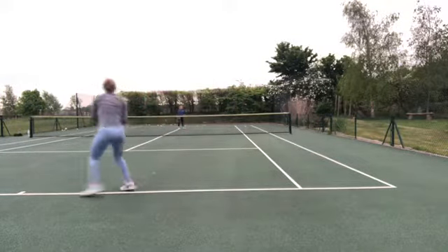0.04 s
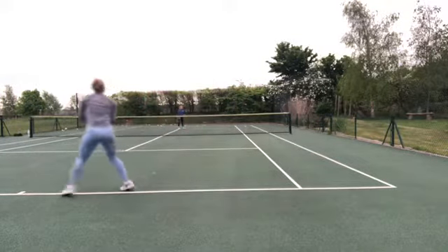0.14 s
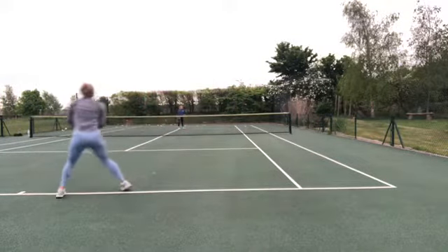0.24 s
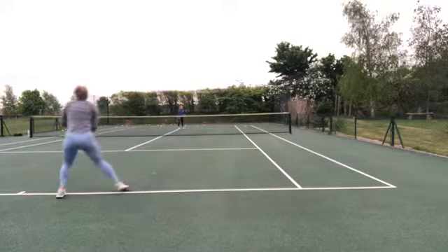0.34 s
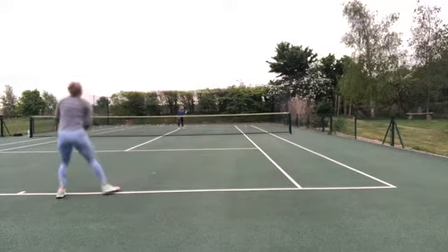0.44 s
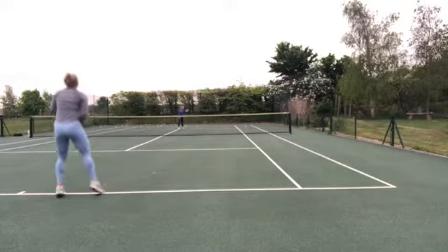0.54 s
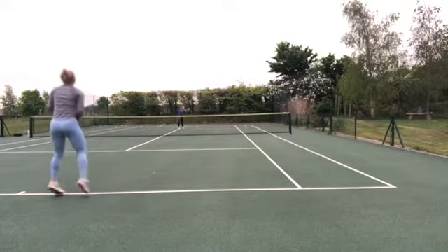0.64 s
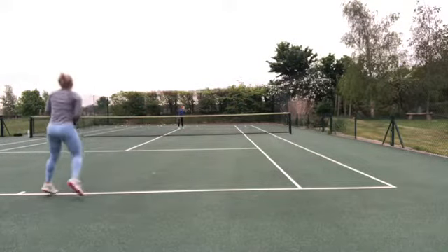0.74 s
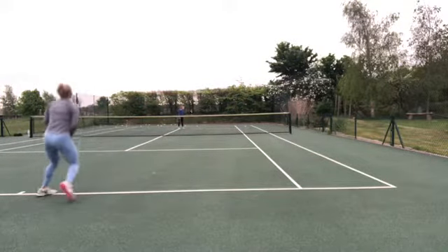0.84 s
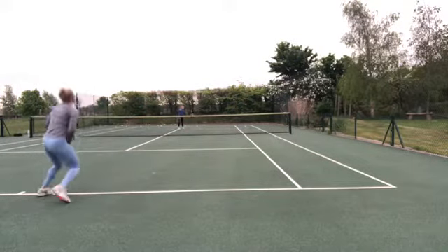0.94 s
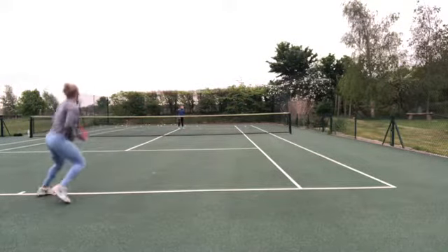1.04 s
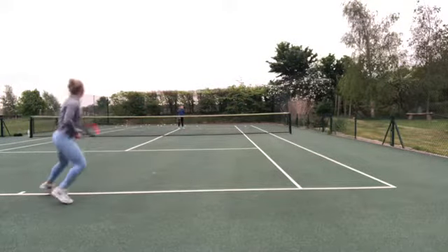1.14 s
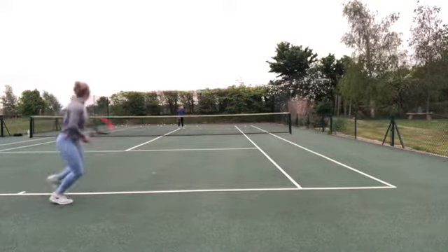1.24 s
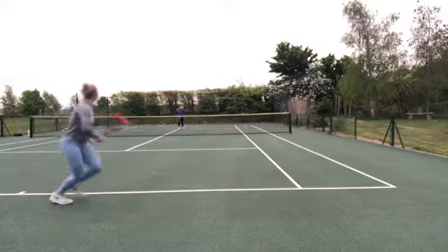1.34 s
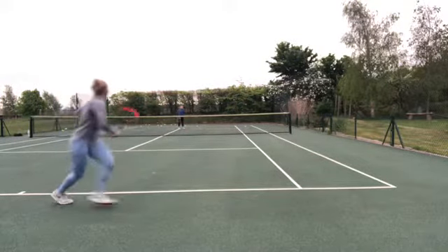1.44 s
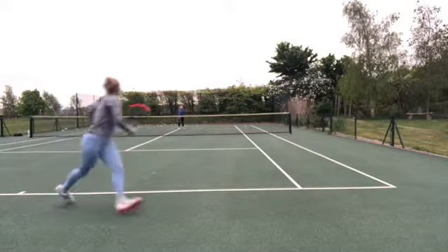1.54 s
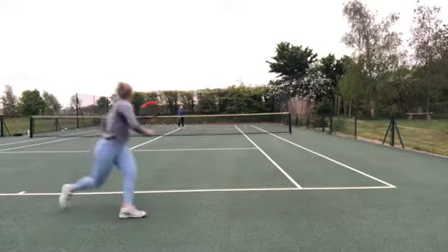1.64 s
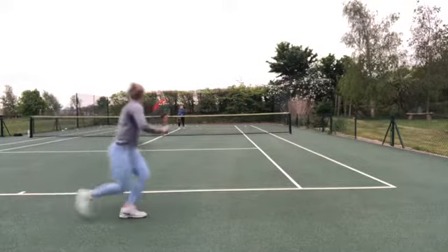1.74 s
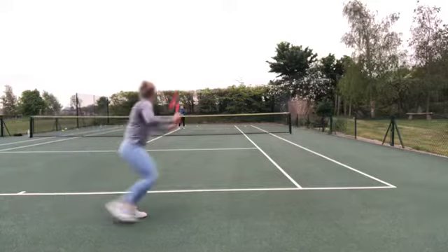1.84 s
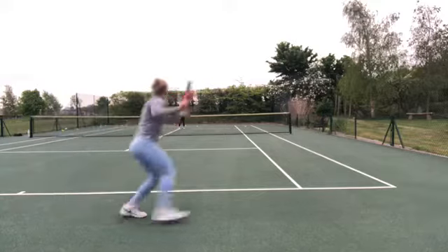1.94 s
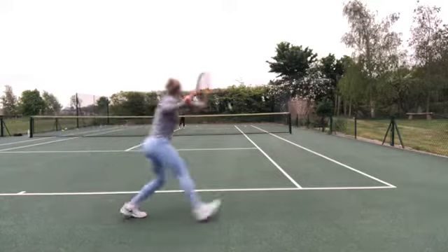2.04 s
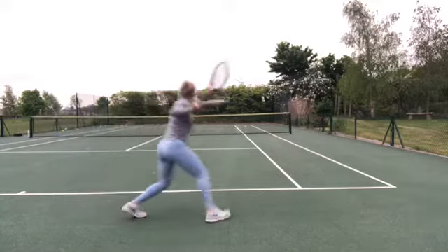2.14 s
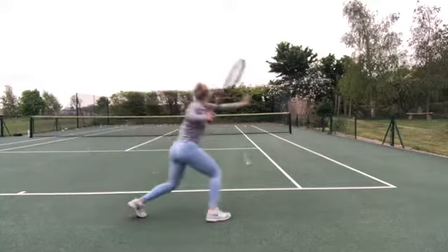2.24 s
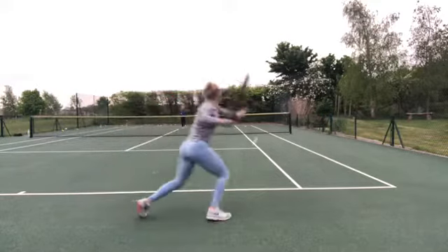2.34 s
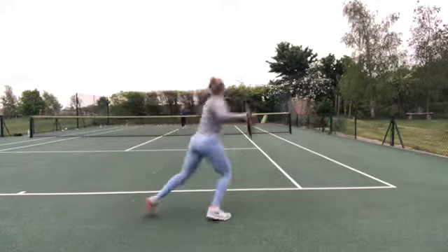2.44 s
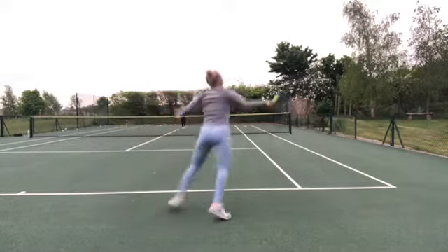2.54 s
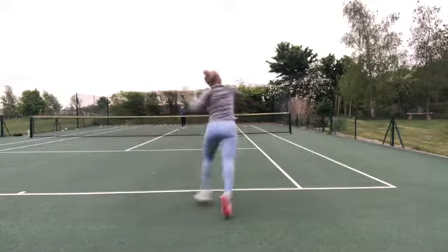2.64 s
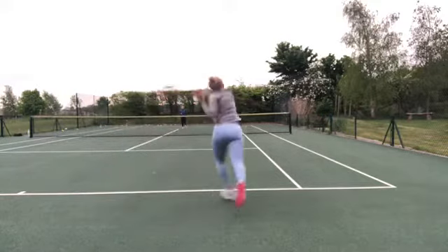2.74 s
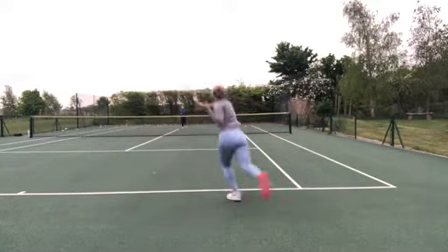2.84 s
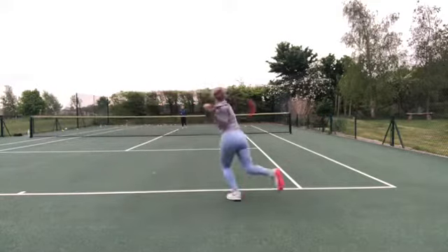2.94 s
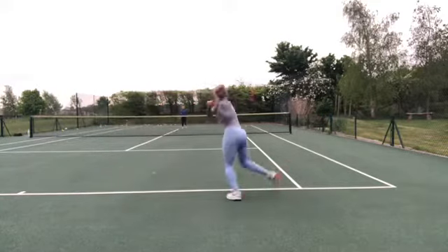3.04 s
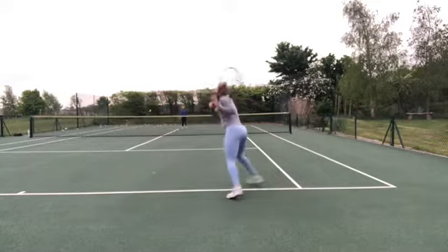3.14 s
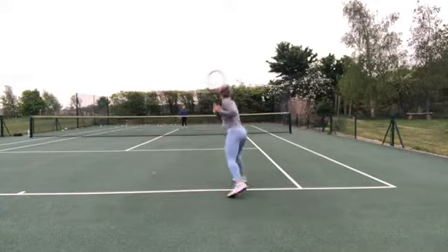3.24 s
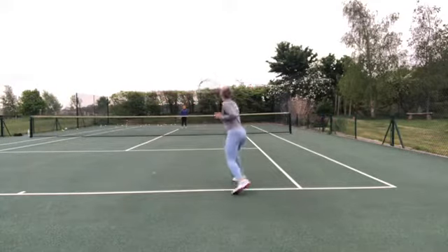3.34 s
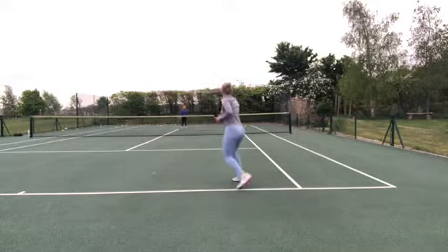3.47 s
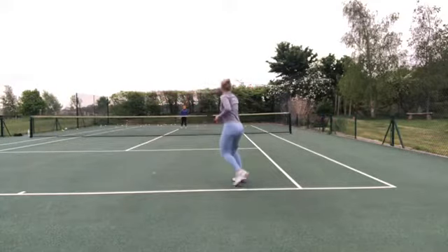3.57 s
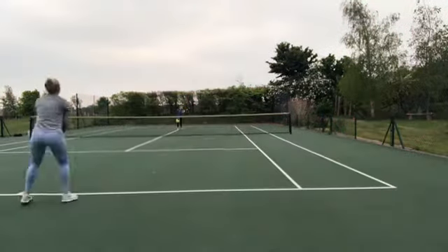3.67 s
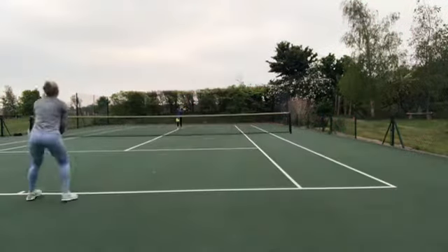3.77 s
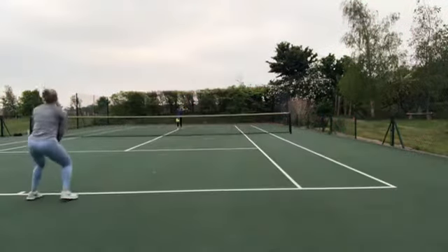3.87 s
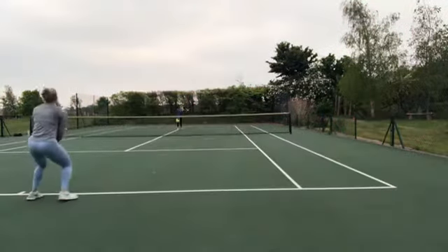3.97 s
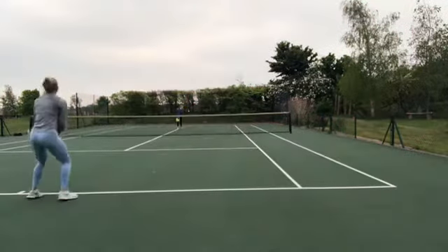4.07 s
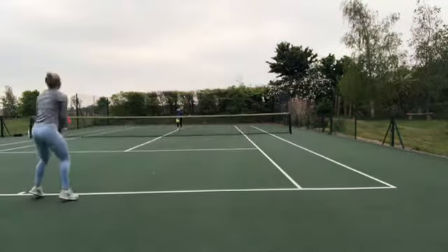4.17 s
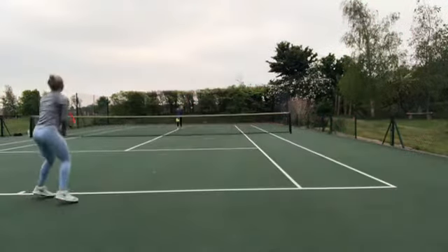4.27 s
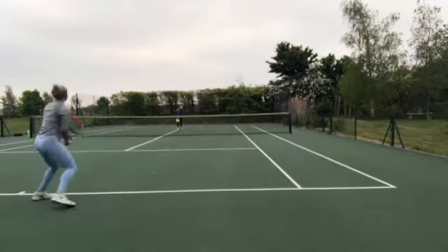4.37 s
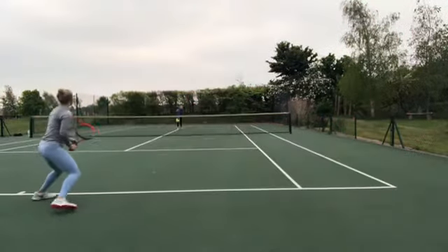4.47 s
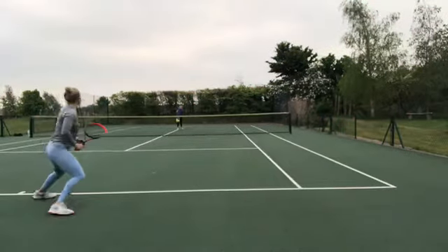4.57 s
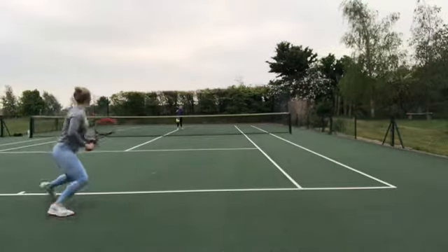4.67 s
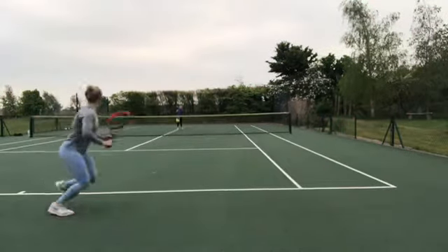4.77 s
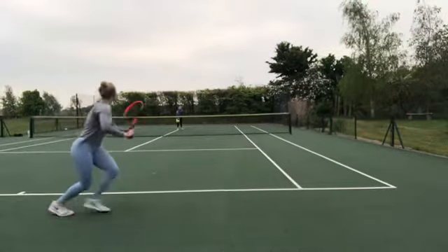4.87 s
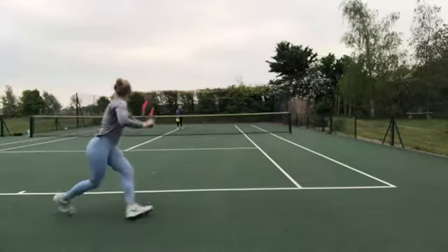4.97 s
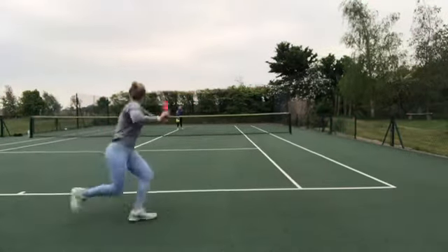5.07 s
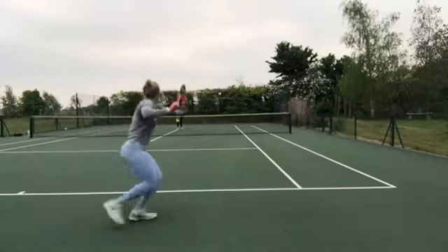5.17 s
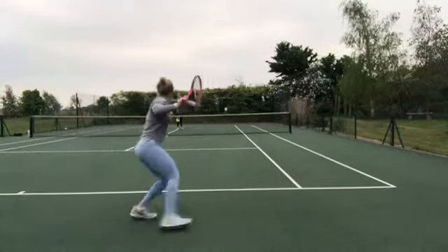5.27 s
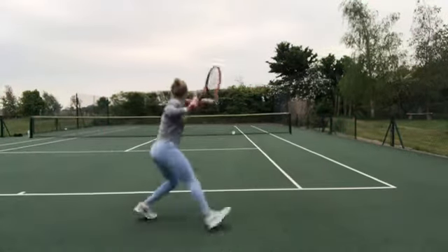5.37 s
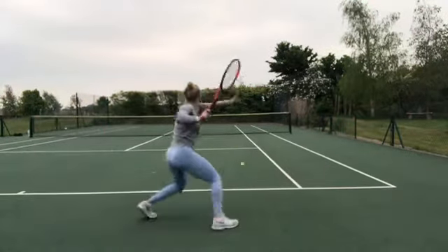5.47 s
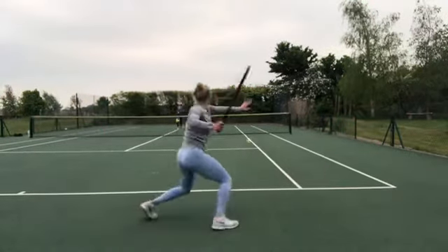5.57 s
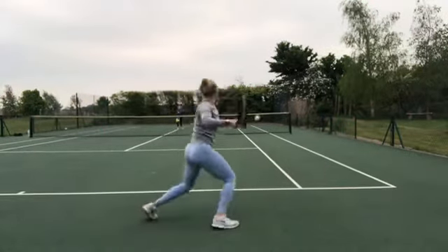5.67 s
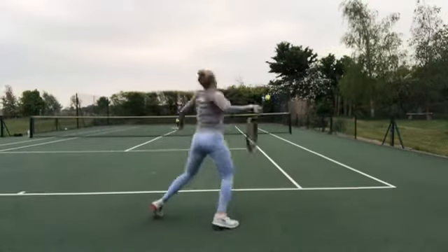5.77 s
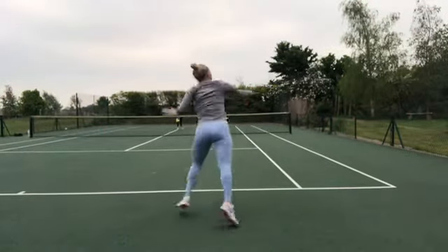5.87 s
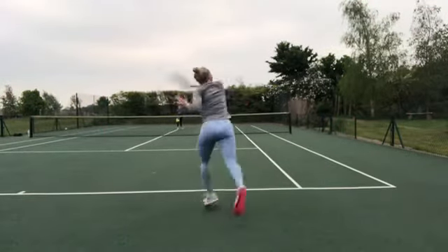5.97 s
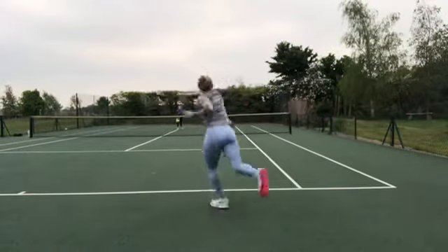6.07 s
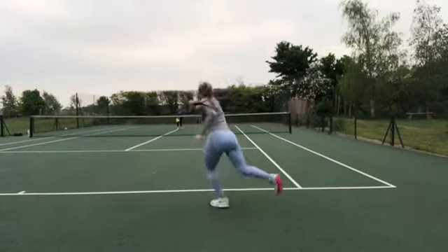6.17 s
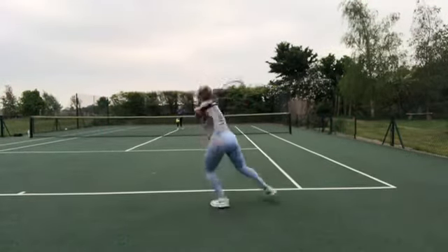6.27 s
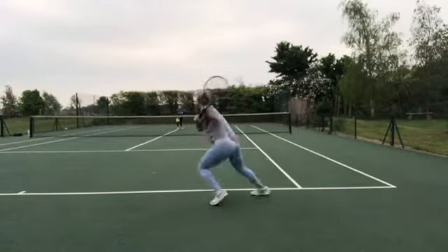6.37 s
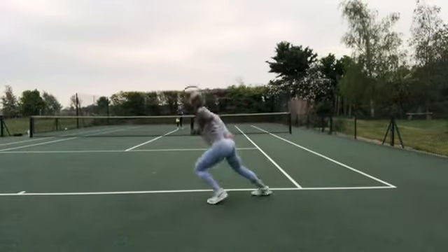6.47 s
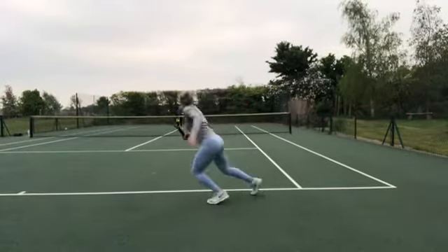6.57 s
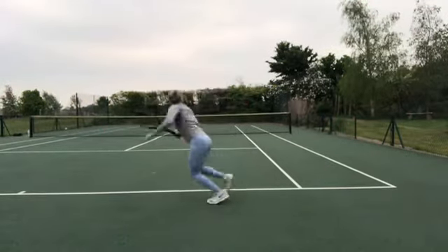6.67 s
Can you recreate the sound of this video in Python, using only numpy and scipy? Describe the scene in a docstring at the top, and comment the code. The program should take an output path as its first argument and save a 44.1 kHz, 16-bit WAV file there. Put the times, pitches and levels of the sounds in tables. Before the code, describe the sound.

Two sharp, loud racket hits on an outdoor hard court, each after a soft ball bounce, with shoe taps, scuffs and faint ticking.

```python
"""Two forehands on an outdoor hard court: soft pushes ring racket and strings, noise snaps, fences echo.
Before each, the ball bounces as short ringing modes and the racket swishes as swelling noise. Shoes tap,
scuff on noise grains and squeak on a wavering sine; a far dove, a short hum and low blips are gliding sines.
Shaped noise makes wind, traffic and the hiss of a small microphone; rung clicks make faint ticks and a buzz.
The bass arrives late; between the strokes the level dips briefly, and the wind is deeper afterwards."""
import sys
import numpy as np
from scipy import signal
from scipy.fft import rfft, irfft, next_fast_len
from scipy.io import wavfile

SR = 44100
rng = np.random.default_rng(int(sys.argv[2]) if len(sys.argv) > 2 else 0)


def digitize_waveform(pressure):
    """Quantize a signal to 16-bit integers and store it at the path in sys.argv[1].

    Rows of a 2-D input are taken as channels; values are limited to [-1, 1].
    """
    field = np.atleast_2d(pressure).T
    bounded = np.clip(field, -1, 1)
    quanta = np.round(bounded * 32767).astype(np.int16)
    wavfile.write(sys.argv[1], SR, quanta)


N = 295911


def amp(db):
    """Decibels to a linear factor."""
    return 10 ** (np.asarray(db) / 20)


def rms_one(x):
    """Scale to rms 1."""
    return x / np.sqrt(np.mean(x ** 2) + 1e-20)


def butter(x, hz, kind, order=2):
    """Butterworth filter."""
    sos = signal.butter(order, np.clip(hz, 10, .45 * SR), kind, fs=SR, output="sos")
    return signal.sosfilt(sos, x)


def clicks(times, sizes):
    """Single-sample pushes."""
    x = np.full(N, 1e-18)
    np.add.at(x, np.round(np.asarray(times) * SR).astype(int), sizes)
    return x


def ring(x, hz, t60):
    """A resonator: a unit click sets a sine of height 1 ringing, 60 dB down after t60 seconds."""
    radius = amp(-60 / (max(t60, .001) * SR))
    w = 2 * np.pi * hz / SR
    return signal.lfilter([0, np.sin(w)], [1, -2 * radius * np.cos(w), radius * radius], x)


def dying(x, t60):
    """Each click becomes a step that fades by 60 dB in t60 seconds."""
    return signal.lfilter([1], [1, -amp(-60 / (max(t60, .001) * SR))], x)


def drift(hz):
    """Slow chance: low-passed noise, rms 1."""
    return rms_one(butter(rng.standard_normal(N + SR), hz, "low")[SR:])


def coloured(spectrum):
    """Noise with the given spectrum, rms 1."""
    hz, db = np.transpose(spectrum)
    size = next_fast_len(N)
    bin_hz = np.arange(size // 2 + 1) * SR / size
    gain = amp(np.interp(np.log(bin_hz + 1), np.log(hz), db, -200, -200))
    return rms_one(irfft(rfft(rng.standard_normal(size)) * gain, size)[:N])


def soft(x, hz):
    """A soft contact: the click is low-passed, its height roughly kept."""
    return butter(x, hz, "low") * SR / (2 * hz)


# Spectrum of the microphone hiss: pitch_hz [Hz], level_db [dB per Hz, relative]
HISS_SPECTRUM = [(1760, -34), (3000, 0), (3590, -7), (3950, -5), (4320, -8.5), (4890, -7.5), (5640, -7.5),
                 (6170, -7.5), (8350, -12), (8880, -10.5), (9520, -16), (14600, -17.5), (15500, -26)]


def hiss():
    """Steady noise of a small microphone, shaped by its spectrum."""
    return amp(-81.5) * coloured(HISS_SPECTRUM)


# Runs of steady electrical ticks: first_s [s], last_s [s], level_db [dB]
TICK_RUNS = [(0.0207, 3.55, -66.5), (3.649, 6.7, -64)]
# Resonances of one tick: pitch_hz [Hz], level_db [dB], t60_s [s]
TICK_MODES = [(1724, -14.5, 0.0034), (2600, 7.5, 0.0019), (3840, -7, 0.0062), (5040, -16, .002),
              (5960, -16.5, 0.0022)]
TICK_SPACING_S = 0.05
STRAYS_PER_S, STRAY_DB = 14.0, -69


def ticks():
    """Clicks from the electronics, twenty a second with weaker strays between, ring a few resonances."""
    stray_levels = amp(STRAY_DB + rng.normal(0, 3.0, N))
    train = (rng.random(N) < STRAYS_PER_S / SR) * stray_levels
    for first, last, db in TICK_RUNS:
        times = np.arange(first, last, TICK_SPACING_S)
        train = train + clicks(times, amp(db + rng.normal(0, 2.8, len(times))))
    return sum(ring(train, hz, t60) * amp(mode_db) for hz, mode_db, t60 in TICK_MODES)


def buzz():
    """A short electrical buzz: an even run of clicks, each ringing one dull resonance."""
    times = np.arange(5.0395, 5.145, 1 / 100)   # a hundred a second
    train = clicks(times, amp(-56.5 + rng.normal(0, 1.2, len(times))))
    return ring(train, 2270, 0.0048)


# Spectrum of far traffic: pitch_hz [Hz], level_db [dB per Hz, relative]
TRAFFIC_SPECTRUM = [(120, -26.5), (200, -3.5), (357, -8.5), (478, -5), (546, -4.5), (623, 1.5),
                    (952, -14.5), (1050, -11), (1180, -14.5), (1290, -15), (1560, -18.5), (2440, -11.5),
                    (3600, -38), (4680, -59.5), (7920, -120)]


def traffic():
    """Far traffic: shaped noise whose low and high parts swell apart."""
    road = amp(-73.5 + 1.5 * drift(1.5)) * coloured(TRAFFIC_SPECTRUM)
    low = butter(road, 1286, "low", order=4)
    high = butter(road, 1380, "high", order=4)
    return amp(1.6 * drift(8)) * low + amp(1.8 * drift(12.8)) * high


# Level path of the wind: time_s [s], level_db [dB]
GUST_LEVELS = [(0, -65.5), (.2, -70.5), (.9, -66), (1.4, -66.5), (2.1, -70), (2.75, -61), (3.0, -67),
               (3.4, -63.5), (3.7, -72.5), (4.3, -71), (4.93, -73), (5.03, -64), (5.3, -70), (5.55, -61.5),
               (5.8, -69), (6.3, -71), (6.71, -76)]
# Wind spectrum before the dip in level: pitch_hz [Hz], level_db [dB per Hz, relative]
WIND_SPECTRUM = [(12, -50), (20, -3), (56, -2.5), (129, 1.5), (173, -4), (285, -14), (319, -16.5),
                 (400, -16), (520, -35.5), (880, -120)]
# Deeper wind spectrum from the dip on: pitch_hz [Hz], level_db [dB per Hz, relative]
DEEP_WIND_SPECTRUM = [(12, -49), (20, 0.5), (80, -4), (141, -9.5), (228, -23), (348, -24), (376, -27),
                      (400, -24), (520, -57), (880, -120)]


def wind():
    """Gusts of low shaped noise, lumpy in level, deeper from the bottom of the dip on."""
    s, db = np.transpose(GUST_LEVELS)
    t = np.arange(N) / SR
    dip_s = LEVEL_DIP[1][0]
    rumble = np.where(t < dip_s, coloured(WIND_SPECTRUM), coloured(DEEP_WIND_SPECTRUM))
    return amp(np.interp(t, s, db) + 2.0 * drift(4.4)) * rumble


def gliding_tones(table):
    """Near-pure tones that glide to a top pitch and away, their level wavering a little."""
    out, t = np.zeros(N), np.arange(N) / SR
    for start, top, end, hz, db, climb_hz, sag_hz, fade_db in table:
        s = np.sort([start, top, end])
        level = amp(np.interp(t, s, [db - 12, db, db - fade_db], -200))   # rises 12 dB to the top
        release = np.clip(1 + (end - t) / 0.01, 0, 1)   # 10 ms
        pitch = np.interp(t, s, [hz - climb_hz, hz, hz - sag_hz])
        out += np.sqrt(2) * level * release * np.sin(2 * np.pi * np.cumsum(pitch) / SR)
    return out * amp(1.2 * drift(16))


# Coos of a far dove; the last row is a short hum near 510 Hz just after the second stroke,
# perhaps the ringing strings: start_s [s], top_s [s], end_s [s], top_hz [Hz], top_db [dB],
# climb_hz [Hz], sag_hz [Hz], fade_db [dB after the top]
COOS_AND_HUM = [(0.978, 1, 1.06, 522, -65, 0, 0, 11), (2.052, 2.116, 2.46, 564, -68, 35, 38.5, 7),
                (2.654, 2.721, 2.88, 526, -60.5, 33, 20, 13), (3.357, 3.397, 3.47, 521, -74.5, 8, 26, 4),
                (5.951, 5.97, 6.005, 512, -54, 11, 2, 9)]


def coos_and_hum():
    """Soft sines climb to a top and sag: a far dove, then a short hum, perhaps the ringing strings."""
    return gliding_tones(COOS_AND_HUM)


# One low blip after each stroke: start_s [s], top_s [s], end_s [s], top_hz [Hz], top_db [dB],
# climb_hz [Hz], sag_hz [Hz], fade_db [dB after the top]
LOW_BLIPS = [(2.903, 2.934, 2.97, 347.3, -56.5, 59.5, 50, 8),
             (6.155, 6.158, 6.2, 316, -56.5, -0.5, 62.3, 19)]


def blips():
    """Short low sines that drop in pitch as they fade."""
    return gliding_tones(LOW_BLIPS)


def grit():
    """Dense uneven noise grains, split into a low rumble and a bright rasp, for taps and scuffs."""
    sizes = np.minimum(rng.exponential(1, (2, N)), 5.0)
    grains = rng.standard_normal((2, N)) * amp(5.2 * sizes)
    rumble = rms_one(butter(grains[0], [300, 850], "band"))
    body = butter(grains[1], [1200, 3100], "band")
    rasp = rms_one(body + 0.45 * butter(grains[1], [2100, 2600], "band"))
    finest = rms_one(butter(grains[1], 3500, "high"))
    return rumble, rasp + amp(-6) * finest


# Soles dragged over grit: start_s [s], loudest_s [s], end_s [s], rumble_db [dB], rasp_db [dB]
SHOE_SCUFFS = [(0.14, 0.16, 0.26, -72, -72.5), (0.331, 0.356, 0.47, -65.5, -67),
               (.692, 0.692, 0.78, -74, -70), (.859, 0.894, 0.88, -86, -68),
               (0.987, 0.994, 1.006, -54, -68), (1.52, 1.545, 1.62, -70.5, -72),
               (3.054, 3.083, 3.2, -82, -76), (3.151, 3.167, 3.237, -61, -61),
               (3.24, 3.348, 3.4, -66, -69.5), (3.888, 3.893, 4.1, -76, -75),
               (4.205, 4.227, 4.57, -70, -76), (4.48, 4.523, 4.556, -68, -65.5),
               (4.833, 4.833, 4.86, -69, -57.5), (4.857, 4.893, 4.908, -60.5, -56.5),
               (4.928, 4.932, 5.003, -52.5, -55), (5.344, 5.344, 5.39, -68, -70.5),
               (6.28, 6.279, 6.32, -63.5, -60)]


def scuffs(rumble, rasp):
    """Soles drag over the grit: rumble and rasp swell and fade together."""
    out, t = np.zeros(N), np.arange(N) / SR
    for start, loudest, end, rumble_db, rasp_db in SHOE_SCUFFS:
        drag = np.interp(t, np.sort([start, loudest, end]), [0, 1, 0])
        out += drag * (amp(rumble_db) * rumble + amp(rasp_db) * rasp)
    return out


# Shoe taps: start_s [s], level_db [dB], slap_db [dB against the thud], thud_hz [Hz], slap_hz [Hz]
SHOE_TAPS = [(0.142, -54, -16, 646, 966), (0.348, -50, -21, 646, 1290), (0.703, -50.5, -4, 222, 1590),
             (0.788, -45, -9.5, 453, 1030), (0.816, -46.5, -14, 616, 966), (0.992, -44.5, -8.5, 345, 915),
             (1.143, -39, -5.5, 490, 1350), (1.524, -45.5, -7.5, 234, 1030),
             (1.581, -42.5, -8.5, 501, 1240), (1.716, -56, -7, 202, 1810), (2.1, -35, -16, 640, 910),
             (2.375, -47, -12.5, 204, 1060), (3.139, -48, -14, 635, 1350), (3.461, -47.5, -4.5, 258, 902),
             (3.74, -47.5, -16, 654, 1300), (3.765, -47, -12, 645, 947), (4.221, -40, -16, 640, 1230),
             (4.258, -42, -13, 520, 1190), (4.341, -48, -6, 245, 1010), (4.485, -45.5, -6.5, 484, 1038),
             (4.834, -51, -14, 302, 1650), (4.931, -44, 2, 394, 1820), (4.981, -34, -7, 500, 1390),
             (5.347, -48.5, -18, 234, 1140), (5.4, -30, -20.5, 631.3, 910), (6.285, -42.5, -15, 423, 912)]


def taps(rumble, rasp):
    """A click rings a short thud and a brighter slap, and loose grit settles after it."""
    out = np.zeros(N)
    part = np.arange(6000)
    kick = 1e-18 + (part == 0)
    for s, db, slap_db, hz, slap_hz in SHOE_TAPS:
        at = round(s * SR)
        here = slice(at, at + len(part))
        thud = butter(ring(kick, hz, 3.6 / hz), 1600, "low")   # 60 dB down in 3.6 cycles
        slap = amp(slap_db) * (ring(kick, 2270, 0.0061) + ring(kick, slap_hz, 0.0037))
        loose = rumble[here] + amp(slap_db) * rasp[here]
        settling = amp(-16.5) * dying(kick, 0.027) * loose
        out[here] += amp(db) * (thud + slap + settling)
    return out


# A sole sticks and slips: time_s [s], pitch_hz [Hz], level_db [dB]
SOLE_SQUEAK = [(4.865, 2720, -76), (4.886, 2600, -58), (4.905, 2500, -47), (4.913, 2500, -72)]


def squeak():
    """Rubber chatters on the court: a falling sine with fast chance wavers in pitch and level."""
    s, hz, db = np.transpose(SOLE_SQUEAK)
    t = np.arange(N) / SR
    pitch = np.interp(t, s, hz) * (1 + 0.0584 * drift(338))
    phase = 2 * np.pi * np.cumsum(pitch) / SR
    level = amp(np.interp(t, s, db, -200, -200) + 2.8 * drift(200))
    return level * np.sin(phase)


# Ball on the court: start_s [s], level_db [dB]
BALL_BOUNCES = [(2.22, -26), (5.459, -26)]
# Modes of the hollow rubber: pitch_hz [Hz], level_db [dB], t60_s [s]
BALL_MODES = [(303, 5.5, 0.0079), (666, -19, 0.054), (1350, 0.5, 0.0073), (2200, -8.5, 0.0087)]


def bounces():
    """Each landing rings the modes of the hollow ball, the loudest for only a few cycles."""
    s, db = np.transpose(BALL_BOUNCES)
    return sum(ring(clicks(s, amp(db + mode_db - 6)), hz, t60) for hz, mode_db, t60 in BALL_MODES)


def swishes():
    """Air through the strings: band-passed noise swells up to the blow, then stops quickly."""
    t = np.arange(N) / SR
    rise_s, fall_s = 0.071, 0.015
    swell = sum(np.interp(t, [s - rise_s, s, s + fall_s], [0, 1, 0]) for s, *rest in RACKET_STROKES)
    air = rms_one(butter(rng.standard_normal(N), (500, 3000), "band"))
    return amp(-63) * swell * air


def cracks():
    """The bright snap of the strings: a noise burst with a weaker, longer fizz, softened at the top."""
    s, db, crack_db = np.transpose(RACKET_STROKES)[:3]
    blow = clicks(s, amp(db + crack_db))
    burst = amp(-18.5) * dying(blow, 0.034)
    fizz = amp(-30.5) * dying(blow, 0.074)
    shape = butter(burst + fizz, 400, "low", order=1)
    noise = butter(rng.standard_normal(N), 2200, "high")
    return shape * butter(noise, 4300, "low")


# Racket on ball: start_s [s], level_db [dB], crack_db [dB], string_bed_db [dB],
# thump_hz [Hz], thump_delay_s [s], thump_db [dB]
RACKET_STROKES = [(2.5702, -17.5, 0.5, -31, 499, .0017, 2), (5.865, -18, -1, -15, 410, 0.00226, 2.5)]
# Pushes within one stroke: delay_s [s], level_db [dB], softness_cut_hz [Hz]
CONTACT_PUSHES = [(0, -2, 2770), (.0018, -5, 2500), (.0033, -14.5, 2500), (.0035, 0, 800),
                  (.0078, -4, 2660)]
# Frame and string modes; each stroke meets another spot of the strings:
# pitch_hz [Hz], t60_s [s], first_stroke_db [dB], second_stroke_db [dB]
RACKET_MODES = [(84, .1, -23.5, -24), (164, .056, -32, -26), (366, .03, -17.5, -27), (791, 0.035, -5.5, -4),
                (1045, 0.054, -20.5, -21), (1246, .062, -12.5, -19), (1467, .087, -26, -22),
                (1747, 0.15, -30.5, -35), (2200, .022, -7, -12.5), (2370, 0.08, -15.5, -22.5),
                (2610, 0.039, -22.5, -22)]
# Fences and hedges that answer: thin_below_hz [Hz], dull_above_hz [Hz], smear_s [s],
# first_stroke_db [dB], second_stroke_db [dB]
ECHO_SURFACES = [(494, 1140, 0.017, -17.5, -17), (500, 1500, 0.016, -32, -28),
                 (500, 1400, 0.026, -36, -24.5), (510, 1600, .016, -30, -27),
                 (250, 1660, 0.0064, -24.5, -30.5), (282, 2300, 0.064, -26, -25)]
# Echo delays, one row a stroke, one column a surface: delay_s [s]
ECHO_DELAYS = [(.058, .074, .115, .141, .158, .234), (.057, .074, .116, .152, .181, .232)]
# Diffuse tail off leaves and wire: pitch_hz [Hz], level_db [dB], t60_s [s]
SCATTER_TAIL = [(200, -43, 0.18), (410, -41, 0.46), (600, -43.5, 0.84), (800, -42.5, 1), (1490, -56, 0.15),
                (2460, -25, 0.14), (2500, -49.5, 1)]


def strokes():
    """The ball flattens on the strings in several pushes; modes ring, surfaces echo, a tail scatters."""
    out = np.zeros(N)
    bands = []
    for hz, tail_db, t60 in SCATTER_TAIL:
        band = rms_one(butter(rng.standard_normal(N), [hz / 1.48, hz * 1.61], "band"))
        bands.append(band * amp(5.45 * drift(32)))   # leaves and wire scatter unevenly: a lumpy tail
    kick = clicks([0], 0.91)[:SR * 3 // 4]

    def late(delay_s):
        """The kick, delayed."""
        return np.roll(kick, round(delay_s * SR))

    for k, (s, db, crack_db, bed_db, thump_hz, thump_s, thump_db) in enumerate(RACKET_STROKES):
        push = sum(soft(-amp(push_db) * late(delay), hz) for delay, push_db, hz in CONTACT_PUSHES)
        modes = sum(amp(mode_db[k]) * ring(late(0.002394), hz, t60) for hz, t60, *mode_db in RACKET_MODES)
        thump = amp(thump_db) * ring(late(thump_s), thump_hz, 0.017)   # the air inside the ball
        direct = butter(push, 178, "high") + modes + thump
        string_bed = ring(late(0.00265), 485, 0.25)   # main note of the strings
        heard = direct + amp(bed_db) * string_bed
        for delay, (low_hz, high_hz, smear, *echo_db) in zip(ECHO_DELAYS[k], ECHO_SURFACES):
            # a rough surface returns one copy, then a spray of weaker ones
            spray = rng.standard_normal(len(kick)) * dying(amp(-31.5) * late(delay), smear)
            answer = butter(direct, [low_hz, high_hz], "band")
            echo = signal.fftconvolve(answer, late(delay) + spray)[:len(kick)]
            heard += amp(echo_db[k]) * echo
        at = round(s * SR)
        here = slice(at, at + len(kick))
        for band, (hz, tail_db, t60) in zip(bands, SCATTER_TAIL):
            fade = butter(dying(late(0.0034), t60), 190, "low", order=1)
            heard += amp(tail_db) * band[here] * fade
        out[here] += amp(db) * heard
    return out


def scene():
    """Court sounds pass the microphone port; ticks, buzz and hiss join after the bass cut."""
    rumble, rasp = grit()
    shoes = taps(rumble, rasp) + scuffs(rumble, rasp) + squeak()
    court = butter(strokes() + bounces() + swishes() + shoes, 175, "high")
    # the port shuts out most treble above 2917 Hz, but some leaks through
    through_port = butter(court, 2917, "low", order=10) + amp(-19) * court
    heard = through_port + cracks() + coos_and_hum() + blips() + wind() + traffic()
    return (butter(heard, 55, "high", order=3) + ticks() + buzz() + hiss())[None]


# Overall level with its brief dip: time_s [s], level_db [dB]
LEVEL_DIP = [(3.548, 6), (3.575, -16.5), (3.599, 4), (3.68, 5)]


def record(dry):
    """Seven all-passes delay the bass, the overall level dips briefly, and the top is cut."""
    a = np.exp(-2 * np.pi * 500 / SR)   # bass below about 500 Hz lags most
    late = signal.sosfilt([[-a, 1, 0, 1, -a, 0]] * 7, dry)
    s, db = np.transpose(LEVEL_DIP)
    dipped = late * amp(np.interp(np.arange(N) / SR, s, db))
    return signal.sosfilt(signal.cheby2(12, 40, 15400, fs=SR, output="sos"), dipped)


dry = scene()
out = record(dry)
digitize_waveform(out)
```